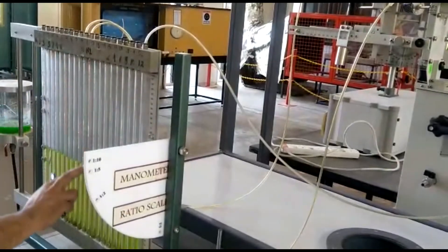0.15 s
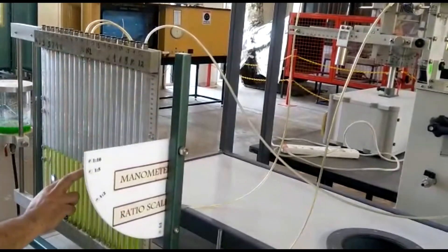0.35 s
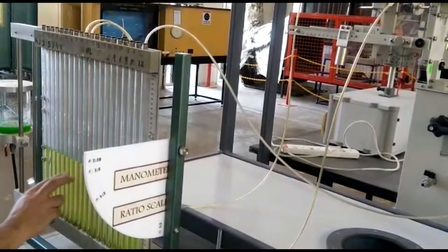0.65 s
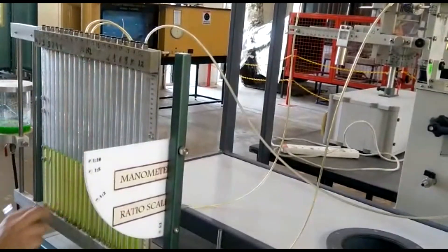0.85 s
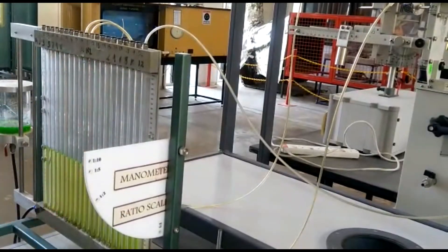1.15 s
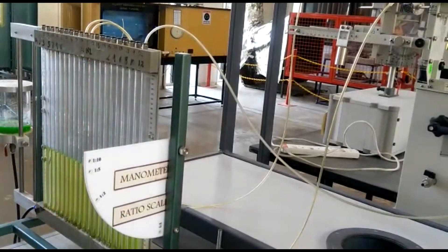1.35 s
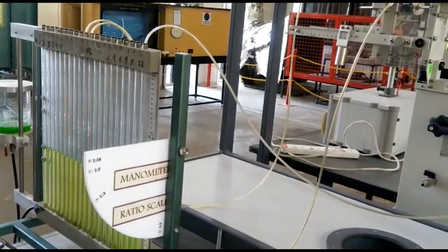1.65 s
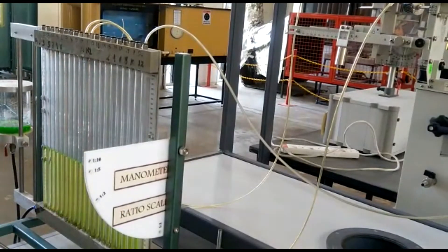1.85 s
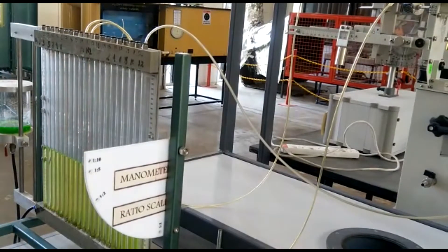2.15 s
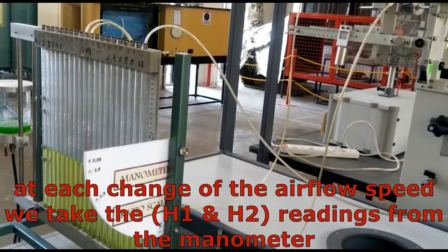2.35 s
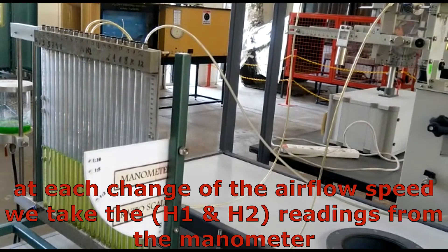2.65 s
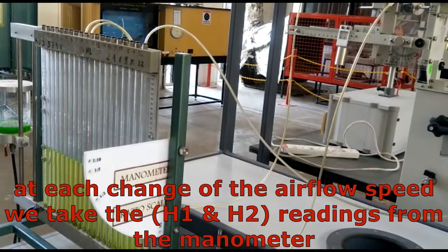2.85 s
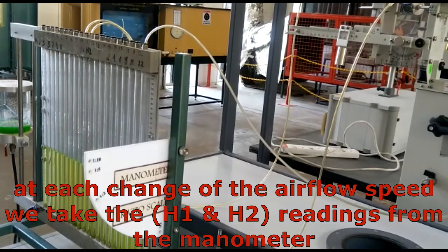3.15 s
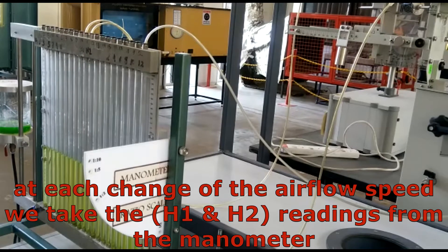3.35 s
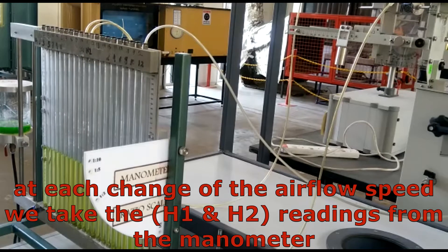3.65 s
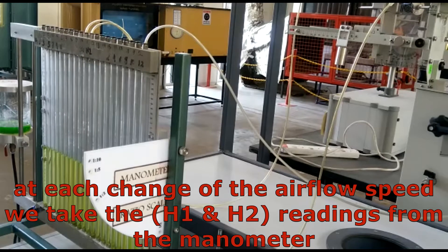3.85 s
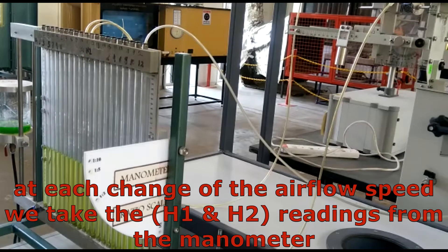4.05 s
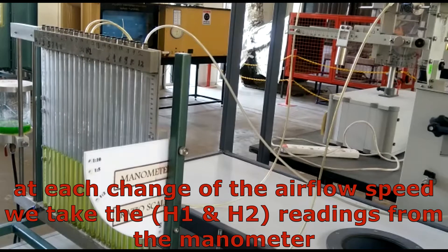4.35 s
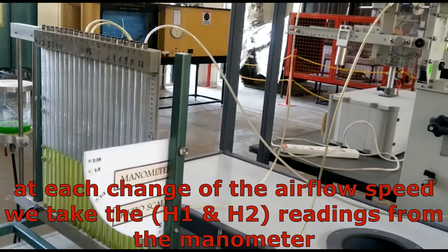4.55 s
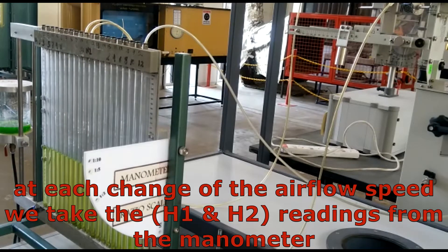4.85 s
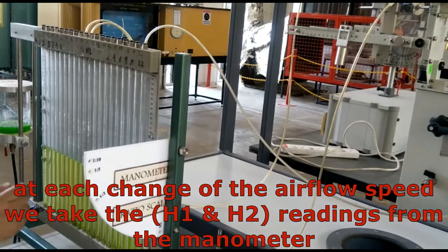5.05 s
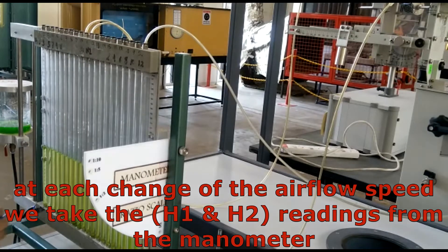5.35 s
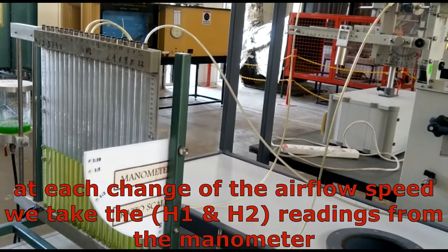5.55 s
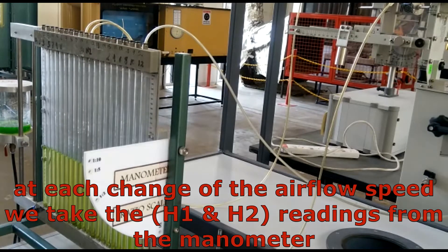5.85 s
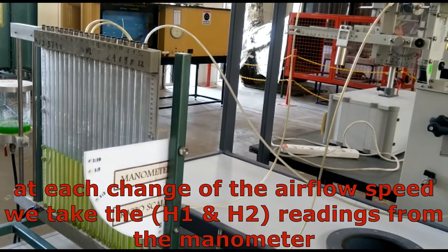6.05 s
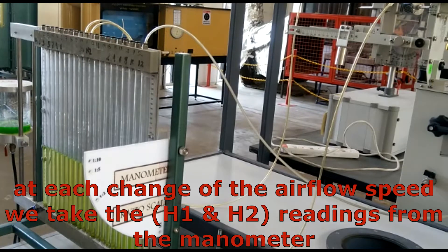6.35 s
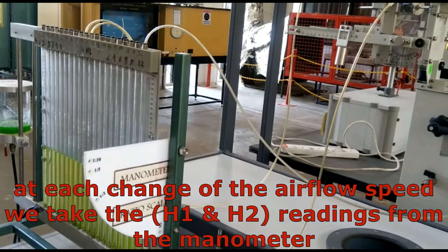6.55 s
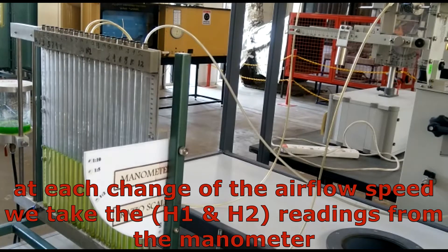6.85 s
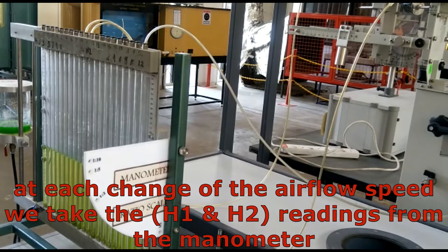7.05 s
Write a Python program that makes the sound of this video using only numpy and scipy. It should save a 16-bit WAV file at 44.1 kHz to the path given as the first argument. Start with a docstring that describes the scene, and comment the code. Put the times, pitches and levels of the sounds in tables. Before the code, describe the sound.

From 0 to about 7 seconds a large fan drives air through a laboratory wind tunnel at an unchanging speed, heard close beside the duct. The foremost sound is a strong hum near 350 Hz, a steady tone blurred by narrow bands of noise, fluttering rapidly and throbbing slightly with each shaft turn. Beneath it lies a deep rumble and boom, roughly 50 to 250 Hz, surging irregularly: softer around 1 second, fuller near 4, with the deepest part dipping again near 6.7 before returning. A broad rush of air fills the space throughout, coloured by hollow casing resonances between about 400 Hz and 3 kHz. Bass and hum sit central; the rush spreads wide, and the upper hiss is mostly left, ending near 8 kHz. It begins and ends already running, with no distinct events.

```python
"""A strong, fluttering hum stands out first, with a deep rumble below it and a rush of air around it.
The scene is a laboratory wind tunnel, heard beside the test section, its fan at a steady speed.
The hum is a sine wave among close bands of noise.
The rumble is noise shaped by the lengthwise and crosswise modes of the duct.
The rush is broad noise plus the narrower modes of the casing, and its highest hiss is mostly on the left."""
import sys
import numpy as np
from scipy import signal
from scipy.fft import rfft, irfft
from scipy.io import wavfile

SR = 44100
rng = np.random.default_rng(int(sys.argv[2]) if len(sys.argv) > 2 else 0)


def waveform_to_disk(signal):
    """Save audio, clipped to [-1, 1], as 16-bit WAV at the path in sys.argv[1]."""
    frames = np.transpose(np.atleast_2d(signal))
    scaled = np.clip(frames, -1, 1) * 32767
    samples = np.round(scaled).astype(np.int16)
    wavfile.write(sys.argv[1], SR, samples)


N = 317948
TIME = np.arange(N) / SR  # seconds
FREQS = np.fft.rfftfreq(N, 1 / SR)  # Hz


def gain_of(db):
    """Turn decibels into an amplitude factor."""
    return 10 ** (np.asarray(db) / 20)


def read(table, column=1):
    """Read one column at every frequency, joining its points by straight lines over log frequency."""
    rows = np.array(table, float)
    rows = rows[np.argsort(rows[:, 0])]
    return np.interp(np.log(FREQS + 1), np.log(rows[:, 0] + 1), rows[:, column])


def resonances(modes):
    """Add up the power per Hz of steep-sided resonances; each width is measured 6 dB below the peak."""
    power = 0
    for hz, width, db in modes:
        offset = 2 * (FREQS - hz) / width
        power = power + (gain_of(db) / (1 + offset ** 2)) ** 2
    return power


def turbulence(power):
    """Make random air pressure by shaping white noise to the given power per Hz."""
    white = rfft(rng.standard_normal(N))
    return irfft(white * np.sqrt(power * SR / 2), N)


def eddies(rate_hz):
    """Make smooth random motion of unit size, with half its power slower than rate_hz."""
    shape = FREQS / (1 + (FREQS / rate_hz) ** 3)
    motion = irfft(rfft(rng.standard_normal(N)) * shape, N)
    return motion / motion.std()


def surge(motion, depth_db):
    """Turn motion into a gain that swings up and down by up to depth_db, then set its mean power to one."""
    gain = gain_of(depth_db * np.tanh(motion))
    return gain / np.sqrt(np.mean(gain ** 2))


def drifting(x, curve, span_s):
    """Make the slow level follow the curve; flutter faster than span_s stays random."""
    window = signal.windows.hann(int(span_s * SR))
    weight = signal.fftconvolve(np.ones(N), window, "same")
    power = signal.fftconvolve(x ** 2, window, "same") / weight
    t, level_db = np.transpose(curve)
    return x / np.sqrt(power + 1e-12) * gain_of(np.interp(TIME, t, level_db))


def low_pass(x, hz):
    """Remove what lies above hz, steeply and without delay."""
    taps = signal.firwin(2047, hz, window=("kaiser", 9), fs=SR)
    return signal.oaconvolve(x, taps, "same")


# broad rush of the air: f/Hz, level/dB per Hz
AIR_HISS = [(20, -81), (60, -74.5), (250, -61), (450, -60), (700, -63), (1500, -63.5), (1950, -69.5),
            (2600, -72), (3700, -66.5), (3850, -65), (6900, -68.5), (7550, -71.5), (8000, -84), (8250, -95)]
# casing modes that the rushing air rings: f/Hz, width/Hz, level/dB per Hz
CASING_MODES = [(413.6, 12, -52), (425.7, 11, -51), (534, 42, -61), (591, 6.5, -53.5), (617, 9.1, -55),
                (644, 9, -54), (758, 47, -55), (853, 10, -55), (864, 11, -53.5), (887, 44, -55.5),
                (970, 5.1, -54), (998, 81, -57.5), (1100, 55, -59.5), (1210, 15, -60), (1242, 27, -57.5),
                (1365.5, 27, -57), (1425, 40, -65), (1508, 76, -63.5), (1713, 120, -61), (1835, 51, -65.5),
                (2020, 19, -65.5), (2220, 190, -66), (2373, 38, -62.5), (2480, 70, -69.5),
                (2702, 52, -65.5), (2740, 37, -68), (3350, 64, -65.5), (3670, 14, -67.5)]
# the rush at the two microphones: f/Hz, left over right level/dB, likeness/0-1
MICROPHONES = [(465, -1, 0.99), (500, 4, .78), (580, 0, .88), (636, 6, 0), (700, 7, 0.3), (770, 5.5, 0.3),
               (810, 1, 0.8), (900, 5, .72), (953, 0, 0.95), (1064, -0.5, 1), (1080, 4, 0.57),
               (1190, -0.5, 1), (1300, 5.5, .76), (1380, -0.5, 0.95), (1630, 1, 0.96), (1770, -1.5, 1),
               (1850, 0, 1), (1980, -1.5, .96), (2350, 1.7, 0.94), (2500, 1, .9), (2660, -2, 1),
               (2900, 2.5, 1), (2980, -1.5, .95), (3260, -5.5, 0.95), (3570, -4, 0.83)]
# nearby surfaces bend the wave front: f/Hz, extra lead of the left microphone/radians
WAVE_BEND = [(380, -1.18), (480, -1.16), (530, -0.68), (610, 1.5), (720, -0.49), (810, 0), (890, 0.14),
             (940, -1), (995, -0.67), (1080, 0.75), (1170, -1.22), (1270, 0.97), (1350, -1.04), (1500, 0.7),
             (1710, -0.86), (1840, 0.1), (2270, 0.24), (2410, 0.58), (2640, -.6), (2790, 0.66),
             (2990, -0.71), (3150, 0.31)]
LEFT_LAG_S, MONO_BELOW_HZ = 0.001395, 380


def rush():
    """Fine turbulence hisses broadly and rings the casing; the two microphones hear it partly unlike."""
    power = gain_of(read(AIR_HISS)) ** 2 + resonances(CASING_MODES)
    left = rfft(turbulence(power))
    scattered = rfft(turbulence(power))
    likeness = np.clip(read(MICROPHONES, column=2), 0, 1)
    # the rush reaches the right side first
    lead = 2 * np.pi * FREQS * LEFT_LAG_S - read(WAVE_BEND)
    shared = likeness * left * np.exp(1j * lead)
    unlike = np.sqrt(1 - likeness ** 2) * scattered
    right = (shared + unlike) / gain_of(read(MICROPHONES))
    # the bass is the same on both sides
    right = np.where(FREQS < MONO_BELOW_HZ, left, right)
    return irfft(np.array([left, right]), N)


# lengthwise modes of the duct: f/Hz, width/Hz, level/dB relative to each other
LENGTHWISE_MODES = [(34, 14, -70.5), (53.7, 13, -61), (69, 13, -53.5), (97.2, 22, -46.5)]
# crosswise modes of the duct: f/Hz, width/Hz, level/dB relative to each other
CROSSWISE_MODES = [(128.3, 28.5, -43.5), (164.6, 53, -48), (207, 11, -49.5), (249, 76, -55)]
# slow level of the deep rumble: t/s, level/dB
DEEP_LEVEL = [(0.0, -34.4), (0.5, -35), (1.0, -39.5), (1.25, -32.8), (2.1, -36.5), (2.35, -32.5),
              (3.15, -35), (3.3, -38), (4.05, -31.5), (4.65, -33.9), (4.9, -37), (6.1, -32), (6.75, -43),
              (7.2, -32.5)]
# slow level of the boom above it, before the boom_db trim: t/s, level/dB
BOOM_DRIFT = [(0.0, -26.5), (0.8, -25.5), (1.15, -31.5), (1.65, -26.5), (2.05, -28), (3.1, -24),
              (3.55, -29.5), (3.85, -24.2), (4.1, -22.5), (4.35, -29), (4.5, -25), (5.4, -27),
              (5.65, -23.5), (5.9, -27.5), (6.95, -27.5), (7.2, -24)]


def rumble(boom_db=-0.65, deep_span_s=0.8, boom_span_s=0.62, eddy_hz=5, deep_surge_db=4.0, boom_surge_db=3):
    """Large eddies shake the lengthwise and crosswise modes of the duct; both surge as each eddy passes."""
    flow = eddies(eddy_hz)
    deep = turbulence(resonances(LENGTHWISE_MODES)) * surge(flow, deep_surge_db)
    boom = turbulence(resonances(CROSSWISE_MODES)) * surge(flow, boom_surge_db)
    deep = drifting(deep, DEEP_LEVEL, deep_span_s)
    boom = drifting(boom, BOOM_DRIFT, boom_span_s)
    return deep + gain_of(boom_db) * boom


# close resonances that make the hum: f/Hz, width/Hz, level/dB relative to each other and the tone
HUM_MODES = [(300.6, 12, -49.5), (330.6, 30, -41.5), (347.9, 12.3, -35), (365.1, 11, -40.5)]
# slow level of the hum, before the small left-right split: t/s, level/dB
HUM_DRIFT = [(0.0, -20), (0.4, -25.5), (0.55, -20), (0.75, -25), (1.15, -20.5), (1.3, -24), (2.05, -21.5),
             (2.2, -25.5), (2.45, -19), (2.65, -25), (3.05, -22.5), (3.2, -20.5), (4.45, -23.5), (5.1, -20),
             (5.25, -25.5), (6.55, -20.5), (7.0, -25.5), (7.2, -20)]
SHAFT_HZ, HUM_LEFT_DB = 47.0, 0.4  # turns per second; left over right


def hum(tone_hz=346.9, tone_db=-29, throb=0.17, span_s=0.33, flutter_hz=12, flutter_db=3.2):
    """The fan's steady tone among close resonances flutters in the flow and throbs once a shaft turn."""
    # tone_db is relative to the resonances
    wave = np.sin(2 * np.pi * (tone_hz * TIME + rng.random()))
    tone = gain_of(tone_db) * np.sqrt(2) * wave
    turn = 1 + throb * np.sin(2 * np.pi * (SHAFT_HZ * TIME + rng.random()))
    flutter = surge(eddies(flutter_hz), flutter_db)
    sound = (turbulence(resonances(HUM_MODES)) + tone) * turn * flutter
    sound = drifting(sound, HUM_DRIFT, span_s)
    return sound * gain_of([[HUM_LEFT_DB / 2], [-HUM_LEFT_DB / 2]])


def scene():
    """Put the rush of air around the rumble and hum in the middle."""
    return rush() + rumble() + hum()


RIGHT_EDGE_HZ, RIGHT_SHELF_HZ, RIGHT_HISS_HZ = 3760, 4600, 7580
EDGE_HZ = 8300  # upper limit of both channels


def record(dry, shelf_db=-31.5, hiss_db=-99.0, leak_db=-45):
    """Drop the right treble to a faint remainder plus its own hiss, then limit the band of both channels."""
    left, right = dry
    body = low_pass(right, RIGHT_EDGE_HZ)
    shelf = low_pass(right, RIGHT_SHELF_HZ) - body
    # hiss_db is per Hz
    hiss = low_pass(turbulence(gain_of(hiss_db) ** 2), RIGHT_HISS_HZ)
    # the leak is a faint copy of the whole right channel
    right = body + gain_of(shelf_db) * shelf + gain_of(leak_db) * right + hiss
    return np.array([low_pass(left, EDGE_HZ), low_pass(right, EDGE_HZ)])


dry = scene()
out = record(dry)
waveform_to_disk(out)
```